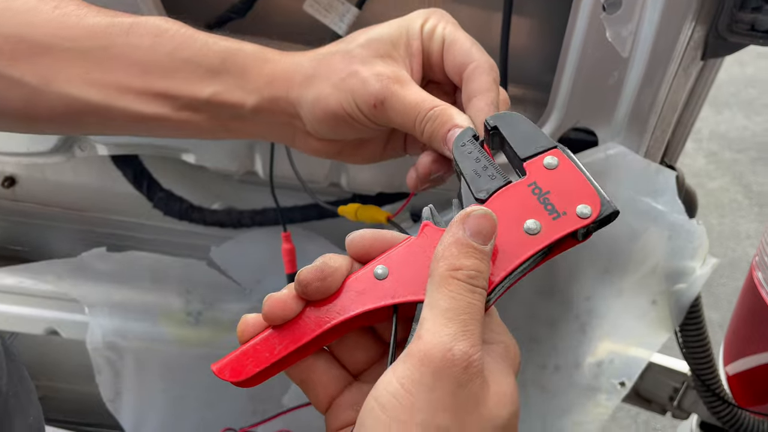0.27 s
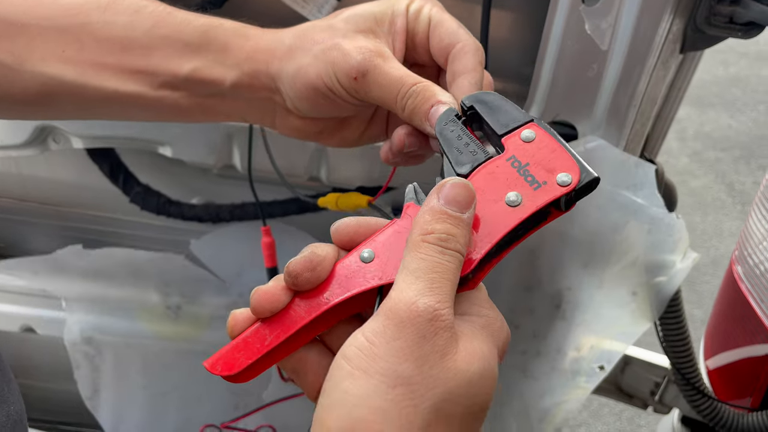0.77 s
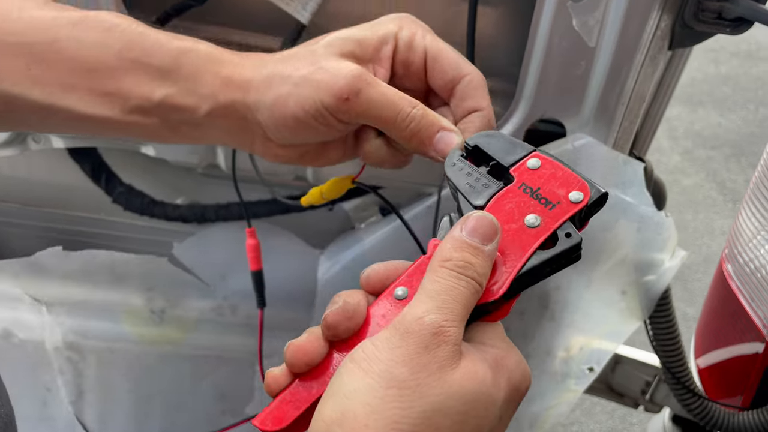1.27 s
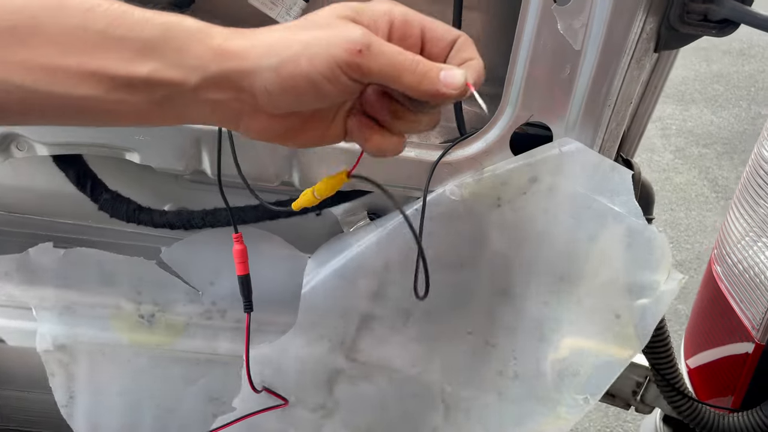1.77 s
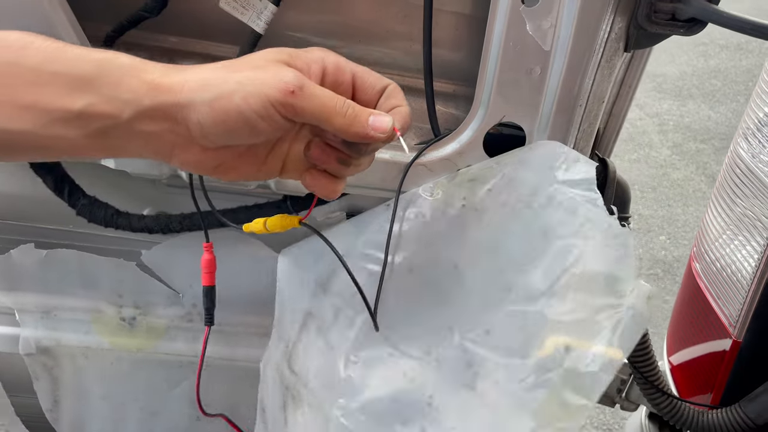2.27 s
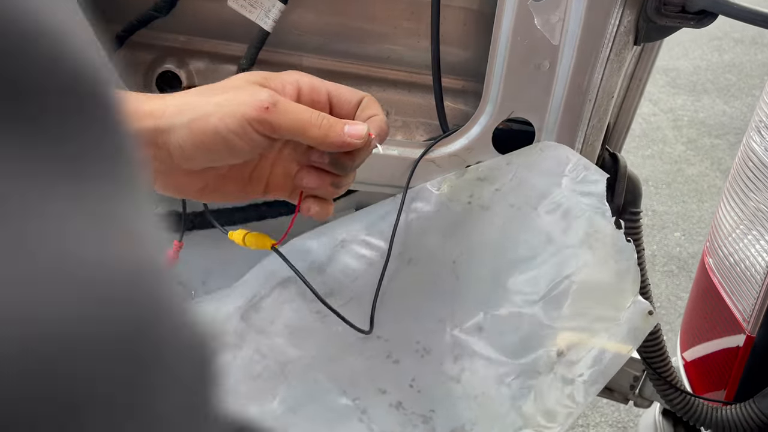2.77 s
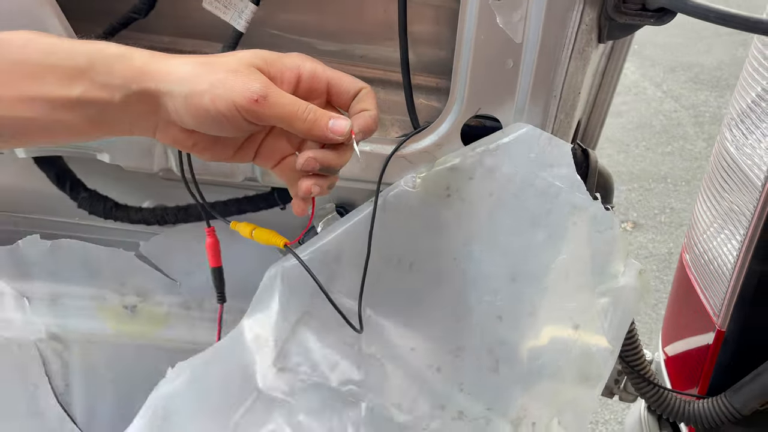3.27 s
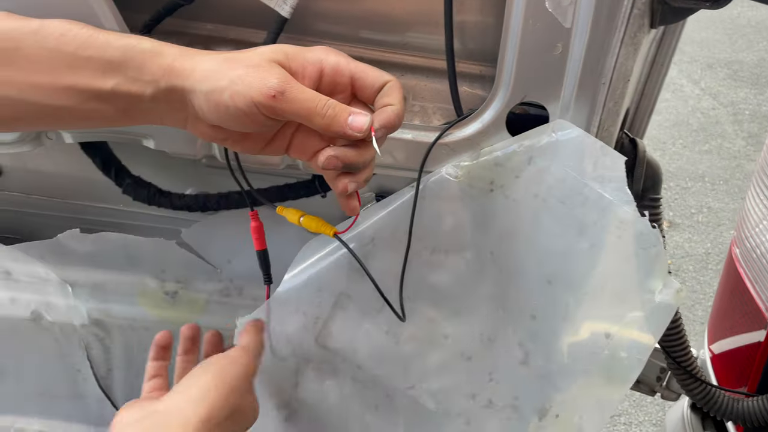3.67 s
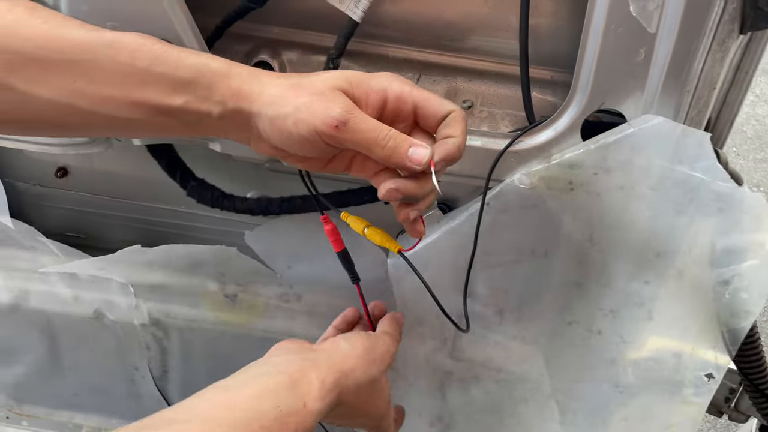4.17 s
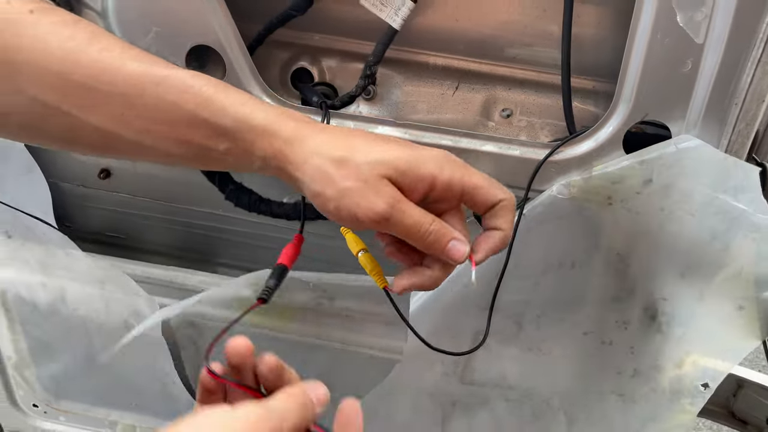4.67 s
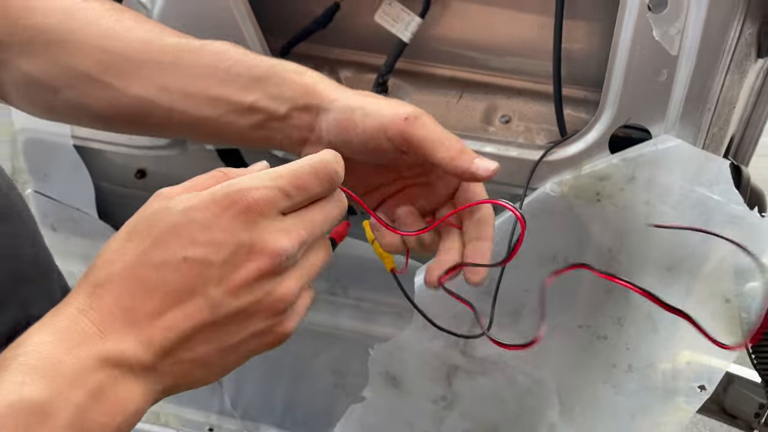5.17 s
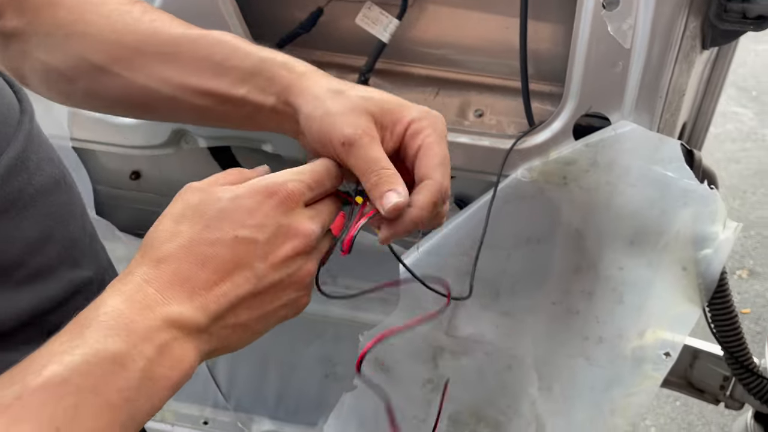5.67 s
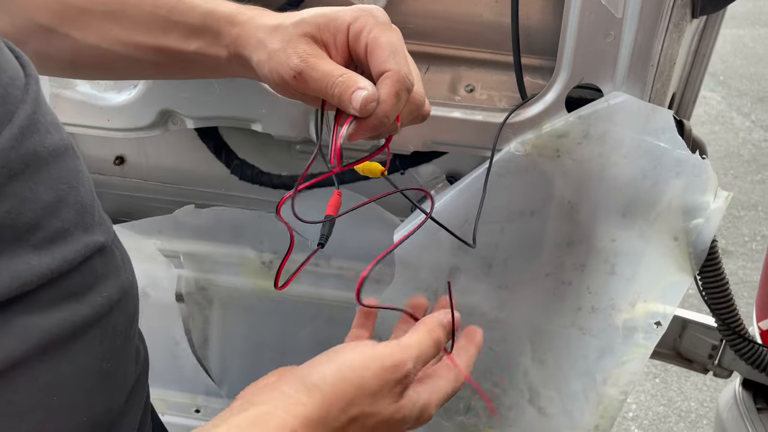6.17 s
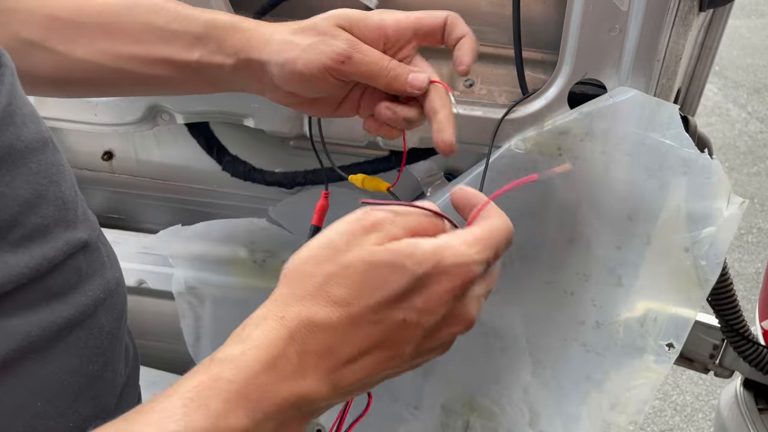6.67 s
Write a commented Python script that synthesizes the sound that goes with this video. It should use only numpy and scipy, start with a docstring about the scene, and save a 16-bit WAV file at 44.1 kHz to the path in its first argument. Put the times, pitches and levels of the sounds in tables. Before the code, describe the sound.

Outdoors beside an open vehicle, with a close stereo microphone, distant low traffic rumble and a faint steady hum around 480 Hz that swells and fades. Small wind thumps open the scene. A tiny click at 0.5 s and a crisper one near 1.0 s come from a plastic and steel wire stripper. At 1.4-1.8 s it snaps sharply in a tight cluster, while wind buffets low. More bright, ratchety clicks come at 2.0-2.4 s, then light taps and a soft foil stroke at 2.6-2.8 s. At 3.2 s the tool hits sheet metal, the loudest event: hard knocks and dull panel ring, another strong bounce at 3.38 s, rattling out by 3.7 s. Foil rustles through 3.4-4.0 s, with a swish at 3.8 s. Loose wire taps the panel at 4.35-4.55 s. Afterwards it is mostly quiet hum and rumble, with one small tap at 6.3 s and barely audible rubbing until 6.9 s.

```python
"""Wire stripper clicked and dropped by an open van

A plastic and steel wire stripper clicks as it grips, strips and springs open, then falls on the
sheet-metal floor and rattles to rest: dying noise forces and clean knocks excite resonant modes.
Hands rustle wire and foil: clumped grains feed the same modes. A distant machine hums (one tone)
over town rumble (banded noise), and a gust buffets the microphone ports (low noise and eddies)."""
import sys
import numpy as np
from scipy import signal
from scipy.fft import rfft, irfft, next_fast_len
from scipy.io import wavfile

SR = 44100
rng = np.random.default_rng(int(sys.argv[2]) if len(sys.argv) > 2 else 0)


def digitize_waveform(pressure):
    """Quantize a signal to 16-bit integers and store it at the path in sys.argv[1].

    Rows of a 2-D input are taken as channels; values are limited to [-1, 1].
    """
    field = np.atleast_2d(pressure).T
    bounded = np.clip(field, -1, 1)
    quanta = np.round(bounded * 32767).astype(np.int16)
    wavfile.write(sys.argv[1], SR, quanta)


N = 305480   # samples


def from_db(db):
    """Decibel law: the amplitude gain of a level."""
    return 10 ** (np.asarray(db) / 20)


def rms_one(x):
    """Power normalization: the signal scaled to rms 1."""
    return x / np.sqrt(np.mean(x ** 2) + 1e-20)


def in_time(rows):
    """Linear interpolation: the columns of a time curve at every sample."""
    s, *columns = np.transpose(rows)
    return [np.interp(np.arange(N) / SR, s, column) for column in columns]


def at_hz(points, hz):
    """Logarithmic pitch: a spectrum table is read on a log-frequency axis."""
    table_hz, values = np.transpose(points)
    return np.interp(np.log(hz + 1), np.log(table_hz + 1), values)


def drift(corner_hz):
    """Low-pass filtered noise: a slow random fluctuation of rms 1."""
    step = 40   # samples between computed points
    r = np.exp(-2 * np.pi * corner_hz * step / SR)
    white = rng.standard_normal(N // step + 2002)
    slow = signal.lfilter([1], [1, -2 * r, r * r], white)[2000:]   # settled part only
    return np.interp(np.arange(N) / step, np.arange(len(slow)), rms_one(slow))


def resonate(x, modes):
    """Modal superposition: parallel resonances of alternate sign; white noise keeps its rms."""
    out, power = 0, 0
    for k, (hz, width, db) in enumerate(modes):
        r = np.exp(-np.pi * width / SR)
        poles = [1, -2 * r * np.cos(2 * np.pi * hz / SR), r * r]
        drive = x[k % len(x)] + 1e-18   # one shared input, or one for each mode
        ringing = signal.lfilter([1, 0, -1], poles, drive)
        out = out + (-1) ** k * from_db(db) * (1 - r * r) / 2 * ringing
        power += from_db(2 * db) * np.pi * width / SR
    return out / np.sqrt(power)


def grains(per_s, spread_db):
    """Shot noise: random clicks of uneven size and sign, at rms 1."""
    size_db = spread_db * np.minimum(rng.exponential(1, N), 5)
    sizes = from_db(size_db) * rng.choice([-1, 1], N)
    return rms_one(sizes * (rng.random(N) < per_s / SR))


# Spectral density of the town rumble: pitch_hz [Hz], density_db [relative dB per Hz]
TOWN_SPECTRUM = [(24, -9.5), (40, -9), (118, -3), (167, -4), (256, 2), (354, -7), (479, -6), (630, -9.5),
                 (965, -15.5), (4130, -30.5), (6490, -135.5), (8770, -71.5), (14100, -51.5), (16000, -77)]
# Left-right correlation of the town rumble: pitch_hz [Hz], likeness [-1 to 1]
TOWN_LIKENESS = [(60, 0.89), (150, 0.98), (380, 0.41), (950, -0.23), (2380, -0.078), (5980, 0.18),
                 (15000, 0.47)]
TOWN_DB = -41   # rms level


def town():
    """Partial coherence: half-octave bands of far traffic noise, each with its flicker and likeness."""
    out, edges_hz = 0, 22 * 2 ** np.arange(0, 9.6, .5)
    white = rng.standard_normal((2, 2, N))
    for k, (low, high) in enumerate(zip(edges_hz, edges_hz[1:])):
        band = signal.butter(2, [low, high], "band", fs=SR, output="sos")
        mid, side = signal.sosfilt(band, white[k % 2])   # neighbouring bands are independent
        hz = np.sqrt(low * high)
        alike = np.clip(at_hz(TOWN_LIKENESS, hz), -1, 1)
        gain = from_db(at_hz(TOWN_SPECTRUM, hz) + 0.4 * drift(12.05))
        out = out + gain * (np.sqrt(1 + alike) * mid + np.sqrt(1 - alike) * side * [[1], [-1]])
    return from_db(TOWN_DB + np.array([[-.4], [.4]])) * rms_one(out)


# Wind buffeting on the ports: time_s [s], level_db [dB]; the low band drops away briefly after the 3.3 s bang
WIND_LEVEL = [(0, -41), (0.3, -54), (1.0, -59), (1.17, -42), (1.62, -36.5), (1.8, -55), (2.4, -55),
              (2.6, -48), (3.22, -41.5), (3.38, -66), (3.9, -44.5), (6.92, -46.5)]
# Single eddies thumping the ports: start_s [s], level_db [dB, near peak], pitch_hz [Hz]
WIND_EDDIES = [(0.146, -28, 330), (1.171, -26, 104), (1.257, -27.5, 118), (1.268, -28.5, 69),
               (1.364, -29, 88), (1.384, -25, 265), (1.443, -27.5, 63.4), (1.466, -30, 105),
               (1.545, -25.5, 107), (1.561, -25, 68.6), (1.584, -23, 101), (1.599, -21, 113),
               (1.619, -22.5, 166), (1.638, -21, 258), (5.135, -30, 77.4)]


def wind():
    """Turbulent pressure: lumpy low noise and single eddies, mostly shared by both ports."""
    low = signal.butter(3, [46, 100], "band", fs=SR, output="sos")
    lumps = from_db(0.9 * drift(60))
    mid, side = signal.sosfilt(low, rng.standard_normal((2, N))) * lumps
    both = mid * from_db([[-.8], [.8]]) + 0.31 * side * [[1], [-1]]
    out = from_db(in_time(WIND_LEVEL)[0]) * rms_one(both)
    for s, db, hz in WIND_EDDIES:
        cycles = np.arange(round(2.5 * SR / hz)) * hz / SR
        # a push that swings to and fro
        thump = np.sin(2 * np.pi * cycles) * cycles * np.exp(1 - 2.53 * cycles) * 3
        out[:, round(s * SR):][:, :len(thump)] += from_db(db + np.array([[.5], [-.5]])) * thump
    return out


# The hum swells and fades: time_s [s], level_db [dB rms]
HUM_LEVEL = [(0, -44), (0.77, -53), (1.9, -40.5), (3.1, -50), (3.5, -45.5), (5.15, -48.5), (5.38, -55.5),
             (5.9, -46), (6.92, -51.5)]
HUM_HZ = 482.8


def hum():
    """Periodic radiation: one tone of a far machine, nearly steady in pitch."""
    phase = 2 * np.pi * HUM_HZ * np.arange(N) / SR + .2 * drift(4)
    right_lead = [[0], [.8]]   # radians
    return np.sqrt(2) * from_db(in_time(HUM_LEVEL)[0]) * np.sin(phase + right_lead)


# Drive of the rustle: time_s [s], level_db [dB]
RUSTLE_LEVEL = [(0, -83), (0.75, -82), (1.04, -75.5), (1.46, -71), (1.62, -64), (1.75, -75), (2.04, -63.5),
                (2.3, -59.5), (2.75, -66.5), (3.26, -68.5), (3.38, -44), (3.6, -57.5), (3.93, -57.5),
                (4.09, -72.5), (4.55, -65.5), (4.93, -90), (5.6, -110), (6.1, -88), (6.92, -76)]
# Strokes across the foil, each a soft swell: middle_s [s], length_s [s], level_db [dB at the top]
FOIL_STROKES = [(0.863, 0.074, -54.5), (2.8, 0.063, -54), (3.06, 0.088, -59.5), (3.832, 0.059, -44.5),
                (5.897, 0.13, -67), (6.219, 0.023, -53), (6.823, 0.14, -67.5)]
RUB_RE_RUSTLE_DB, RUB_LEAST_DB = 4, -73.5   # the midrange rub follows the rustle, over a base
STROKE_RUB_DB = -3   # midrange of a stroke re its treble


def handling_force():
    """Friction: loose parts, wire and foil rub and tick in clumps; strokes swell above that."""
    rustle_db, t = in_time(RUSTLE_LEVEL)[0], np.arange(N) / SR
    rub = from_db(rustle_db + RUB_RE_RUSTLE_DB) + from_db(RUB_LEAST_DB)
    rub = rub * from_db(2.7 * drift(27.4))
    swish = from_db(rustle_db + 1.8 * drift(10))
    strokes = 0
    for middle_s, length_s, db in FOIL_STROKES:
        half_cycle = np.pi * np.clip((t - middle_s) / length_s, -.5, .5)
        strokes = strokes + from_db(db) * np.cos(half_cycle)
    handles = rub + from_db(STROKE_RUB_DB) * strokes
    jaws, panel = swish + strokes, from_db(10.0) * rub
    return np.array([jaws, panel] + [handles] * len(HANDLE_MODES))


# Modes of the plastic handles: pitch_hz [Hz], width_hz [Hz], level_db [relative dB]
HANDLE_MODES = [(1630, 280, 0), (1960, 220, 1), (2300, 220, -2), (2600, 240, -2), (2960, 150, 2),
                (3300, 220, -1), (3730, 110, 2), (4000, 120, 0), (4750, 260, -1), (5400, 350, -3),
                (6600, 800, -2)]
# Modes of the steel jaws: pitch_hz [Hz], width_hz [Hz], level_db [relative dB]
JAW_MODES = [(8400, 1500, 1), (10700, 1200, 0), (12100, 1200, -2), (13800, 1300, -1), (15450, 400, 0)]
# Modes of the sheet-metal panel: pitch_hz [Hz], width_hz [Hz], level_db [relative dB]
PANEL_MODES = [(137.2, 38, 0), (187.2, 29, 7), (266.7, 44, 3), (367.5, 102, -1), (460, 130, 1),
               (700, 235, -2.5), (935, 186, -2), (1110, 209, -4), (1400, 234, -13)]
# A stiff rib that mainly hard blows reach: pitch_hz [Hz], width_hz [Hz], level_db [relative dB]
RIB_MODES = [(1000, 110, -12), (1165, 95, 0), (1320, 120, -4)]


def tool(force, per_s=4500, spread_db=3.2):
    """Forced vibration: a force broken into tiny knocks rings the jaws, panel, rib and handles."""
    ticks = force * grains(per_s, spread_db)
    # handle modes are favoured unevenly from moment to moment
    patchy = from_db([3.5 * drift(70) for _ in HANDLE_MODES])
    hardness = np.tanh(force[1] / 0.4)
    jaws = resonate(ticks[:1], JAW_MODES)
    panel = resonate(ticks[1:2], PANEL_MODES)
    rib = from_db(-2.5) * resonate(ticks[1:2] * hardness, RIB_MODES)
    return jaws + panel + rib + resonate(ticks[2:] * patchy, HANDLE_MODES)


# Clicks of the tool in the hand: start_s [s], level_db [dB of force],
# pitch_hz [Hz, handle pitch struck nearest], jaw_db [dB re force], t60_s [s of chatter]
HAND_CLICKS = [(0.4665, -40.5, 3500, 4, 0.018), (0.8445, -44, 3000, 5, .02), (0.8854, -44, 1500, 5, .016),
               (0.9375, -40, 6500, 3, .018), (0.974, -24.5, 2700, 5.5, 0.022), (0.9885, -37, 6500, 4, .018),
               (1.4225, -24, 2900, -1, .032), (1.4355, -22, 3300, 3, 0.02), (1.4622, -19, 3300, 0, .028),
               (1.505, -29, 2800, -13, 0.04), (1.6044, -25, 2100, -5, 0.017),
               (1.6362, -36, 2370, -21, 0.045), (1.6496, -29, 3400, -5, 0.038),
               (1.691, -28, 5440, -9, 0.026), (1.789, -31, 3460, -17, 0.055), (1.958, -45, 4500, 8, .014),
               (2.02, -26, 3900, 2, 0.04), (2.032, -24, 3300, 2, 0.055), (2.0554, -33, 4850, -5, .05),
               (2.168, -23, 2200, -3, .022), (2.199, -29, 3470, 1, 0.045), (2.2205, -35, 4000, -9, .06),
               (2.2535, -27, 4000, -2, .035), (2.2618, -24.5, 3820, 2, 0.032), (2.28, -30, 4140, 3, 0.033),
               (2.3865, -25, 3700, 2, .026), (2.422, -37, 3000, -6, .05)]
# Bounces on the floor: start_s [s], level_db [dB of force], pitch_hz [Hz, handle pitch struck nearest],
# jaw_db [dB re force], panel_db [dB re force], t60_s [s of chatter]
FLOOR_BOUNCES = [(3.2007, -22, 2170, -37, 9.5, 0.14), (3.21, -14, 4800, 9, 3, 0.022),
                 (3.213, -15, 1840, 2, 3, 0.026), (3.2347, -15, 5100, 11, 4, 0.025),
                 (3.243, -15, 3900, 0, 0, 0.05), (3.2675, -17.5, 2750, -5, 7, 0.076),
                 (3.2935, -20.5, 1980, -9.5, 5, .054), (3.3077, -25.5, 1970, -15, 10, 0.04),
                 (3.3444, -24, 4500, 5, 6, 0.03), (3.373, -36, 4130, -3, 19.5, 0.041),
                 (3.3842, -14, 3200, 2, 4.5, .032), (3.4232, -26, 3000, 7.5, 8, 0.038),
                 (3.4505, -25, 3500, 4, 4.5, 0.039), (3.5485, -31.5, 2940, -6, 1, 0.026),
                 (3.628, -28, 4040, -1, -4, 0.11), (3.649, -27, 3000, -10, 5, .04),
                 (3.659, -23, 2300, -2, 0, .04), (3.696, -26, 3970, -5, 1, 0.045)]
# Loose wire tapping the panel: start_s [s], level_db [dB of force], panel_db [dB re force],
# t60_s [s of chatter]
WIRE_TAPS = [(2.624, -33.5, 3, 0.094), (2.648, -32, -1, 0.06), (2.669, -31, -1, .04),
             (4.349, -40, 15, .045), (4.3764, -31.5, -13, .038), (4.3924, -32.5, -11, .04),
             (4.4114, -34, 2, .035), (4.4305, -38, 6, .04), (4.468, -32, 6, .045), (4.518, -36, 9, 0.045),
             (4.5364, -36, 4, .022), (6.293, -30, 6, 0.045)]
HELD_PANEL_DB = -20   # re force: a held tool barely reaches the panel
TAP_HZ, TAP_JAW_DB = 2400, -7   # handle pitch struck nearest; jaw re force


def contacts():
    """Impact excitation: clicks, bounces and taps share one form of contact row."""
    held = [(s, db, hz, jaw_db, HELD_PANEL_DB, t60) for s, db, hz, jaw_db, t60 in HAND_CLICKS]
    taps = [(s, db, TAP_HZ, TAP_JAW_DB, panel_db, t60) for s, db, panel_db, t60 in WIRE_TAPS]
    return held + FLOOR_BOUNCES + taps


# rise time re chatter time; contacts weaker than HARD_DB scrape in more slowly
RISE_SHARE, RISE_SHARE_PER_DB, HARD_DB = .045, .0015, -15


def contact_force():
    """Exponential decay: the dying force of every contact on jaws, panel and each handle mode."""
    mode_hz = np.array(HANDLE_MODES)[:, 0]
    force = np.zeros((2 + len(HANDLE_MODES), N))
    for s, db, hz, jaw_db, panel_db, t60 in contacts():
        fall_s = max(t60, .004)
        at, t = round(s * SR), np.arange(round(fall_s * SR)) / SR
        rise_share = RISE_SHARE + RISE_SHARE_PER_DB * max(HARD_DB - db, 0)
        rise = 1 - np.exp(-t / (rise_share * t60 + 1e-4))
        chatter = rise * from_db(-60 * t / fall_s)
        # modes near the struck pitch are driven most
        handle_db = 6 - 12 * np.tanh(np.abs(np.log2(mode_hz / hz)))
        part_db = np.r_[jaw_db, panel_db, handle_db]
        force[:, at:at + len(t)] += from_db(db + part_db)[:, None] * chatter
    return force


SCATTER_T60_S, SCATTER_DB = 0.14, -3


def scatter(force):
    """Diffuse reflection: dense midrange off the bodywork, lingering and unlike on each side."""
    r = from_db(-60 / (SCATTER_T60_S * SR))
    energy = signal.lfilter([1 - r * r], [1, -r * r], force ** 2 + 1e-18)
    lingering = np.sqrt(np.abs(energy))
    walls = signal.butter(2, [500, 6500], "band", fs=SR, output="sos")
    return from_db(SCATTER_DB) * signal.sosfilt(walls, [tool(lingering), tool(lingering)])


# Clean single knocks amid the chatter: start_s [s], level_db [dB of strike],
# pitch_hz [Hz, pitch struck nearest]
CLEAN_KNOCKS = [(1.4375, -18, 2900), (1.4632, -18, 3700), (1.5102, -28, 3700), (2.0335, -18, 3000),
                (2.0585, -29, 4600), (2.1695, -14, 1700), (2.2628, -21, 3100), (2.2645, -25, 1700),
                (2.3875, -21, 1900), (2.675, -27, 1550), (2.723, -23, 370), (3.2108, -4, 1170),
                (3.2155, -12, 190), (3.2375, -9, 1250), (3.2438, -11, 1400), (3.248, -14, 3400),
                (3.2705, -13, 1120), (3.3095, -13, 1250), (3.3863, -10, 950), (3.388, -21, 260),
                (3.6405, -29, 3950), (3.6625, -21, 1350), (3.666, -29, 290), (3.697, -24, 370),
                (4.36, -25, 420), (4.4735, -23, 1200), (6.3, -23, 750)]
# modes far from the struck pitch ring less, unevenly, and fall on with distance in pitch
KNOCK_FALL_DB, KNOCK_REACH_OCT, KNOCK_SPREAD_DB, KNOCK_DB_PER_OCT = 18, .4, 2, 4


def knocks():
    """Free vibration: each clean knock is an impulse that sets panel, rib and handle modes ringing."""
    out, modes = 0, PANEL_MODES + RIB_MODES + HANDLE_MODES
    s, db, near_hz = np.transpose(CLEAN_KNOCKS)
    uneven_db = KNOCK_SPREAD_DB * rng.standard_normal((len(s), len(modes)))
    for k, (hz, width, mode_db) in enumerate(modes):
        r, w = np.exp(-np.pi * width / SR), 2 * np.pi * hz / SR
        octaves = np.abs(np.log2(hz / near_hz))
        reach_db = -KNOCK_FALL_DB * np.tanh(octaves / KNOCK_REACH_OCT) - KNOCK_DB_PER_OCT * octaves
        impulses = np.zeros(N)
        strike = from_db(db + mode_db + reach_db + uneven_db[:, k])
        impulses[(s * SR).astype(int)] = (-1) ** k * strike
        out = out + signal.lfilter([.5, 0, -.5], [1, -2 * r * np.cos(w), r * r], impulses + 1e-18)
    return out


# Phase between the two ports for a near source: pitch_hz [Hz], left_lead [radians]
PORT_PHASE = [(100, 0), (1300, -1.3), (1950, -1.4), (2800, 1.1), (3600, 1.2), (4650, .3), (8600, -3.14),
              (11300, -4.9), (13400, -6.0), (15700, -6.8)]
# Balance of near sounds: pitch_hz [Hz], left_minus_right_db [dB]
PORT_LEAN = [(200, -2.5), (900, -.5), (4200, 2), (10000, 0)]


def ports(near):
    """Interchannel difference: direct sound gets a phase step and a lean that change with pitch."""
    size = next_fast_len(N + SR // 10)
    hz = np.fft.rfftfreq(size, 1 / SR)
    # half the difference goes to each side
    half = np.exp(.5j * at_hz(PORT_PHASE, hz)) * from_db(at_hz(PORT_LEAN, hz) / 2)
    return irfft(np.array([half, 1 / half]) * rfft(near, size), size)[:, :N]


def scene():
    """Superposition: near sounds through the ports add to their scatter and to the far sounds."""
    blows, handling = contact_force(), handling_force()
    near = tool(blows) + tool(handling, per_s=2000, spread_db=3.5) + knocks()
    return ports(near) + scatter(blows + handling) + town() + wind() + hum()


CUTOFF_HZ = 16700


def record(dry):
    """Band limiting and saturation: deep bass is dropped, peaks are rounded and the top is cut."""
    lean = signal.sosfilt(signal.butter(2, 40, "high", fs=SR, output="sos"), dry)
    rounded = .95 * np.tanh(lean / .95)
    return signal.sosfilt(signal.ellip(12, .5, 75, CUTOFF_HZ, fs=SR, output="sos"), rounded)


dry = scene()
out = record(dry)
digitize_waveform(out)
```